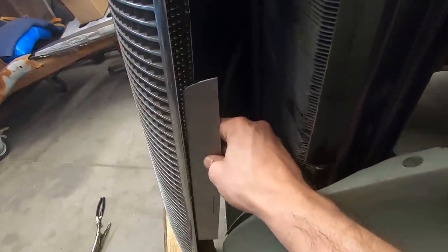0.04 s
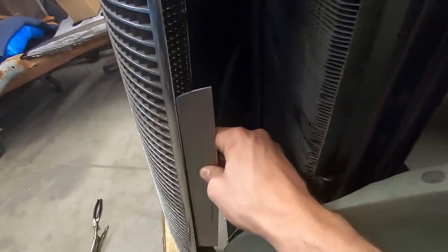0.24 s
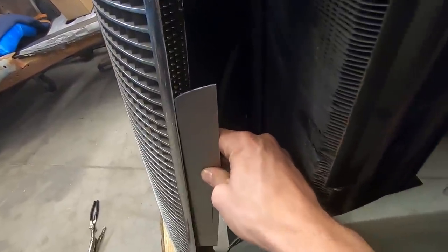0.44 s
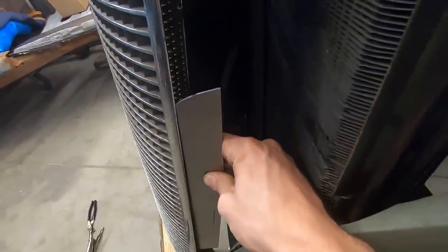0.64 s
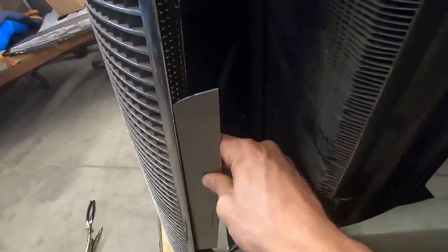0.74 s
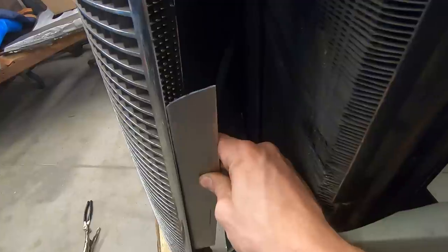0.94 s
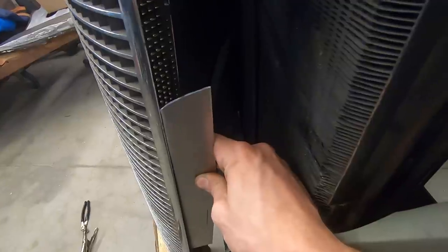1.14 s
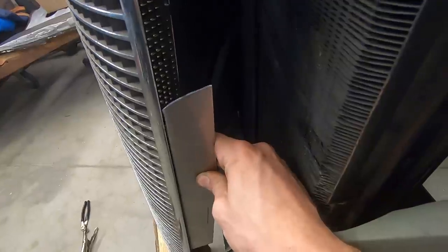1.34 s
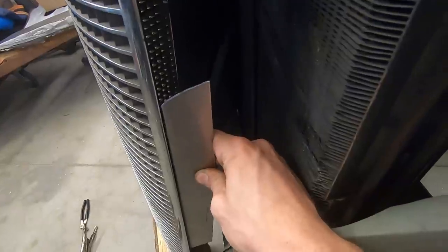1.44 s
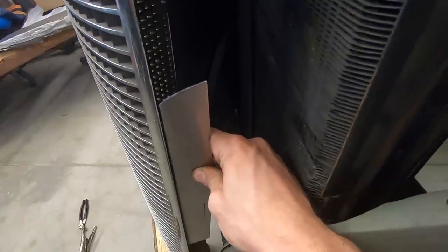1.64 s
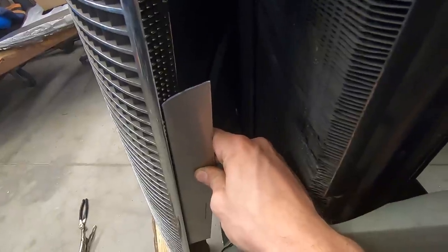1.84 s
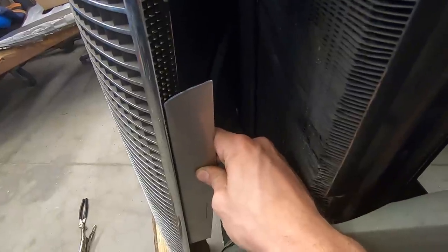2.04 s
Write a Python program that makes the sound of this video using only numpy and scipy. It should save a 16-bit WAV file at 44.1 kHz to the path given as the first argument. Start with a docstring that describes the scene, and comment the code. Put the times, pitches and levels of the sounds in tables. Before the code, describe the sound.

Sheet metal clanks sharply against a car grille, rings through a garage, then scrapes and knocks softly

```python
"""A bent metal sheet is pressed into place against a car grille in a hard-walled garage. Faint contacts come
first, then loud clanks and rebounds; short scrapes, edge ticks and soft knocks follow. Blows and stick-slip
pushes excite decaying modes, noise bursts and dense reverberant ringing. Low sinusoids swell as the panel
flexes; a fixed colour of narrow and broad bands marks every contact. Steady shaped noise, the still air of the
garage, lies beneath from start to end."""
import sys
import numpy as np
from scipy import signal
from scipy.fft import rfft, irfft
from scipy.io import wavfile

SR = 44100
rng = np.random.default_rng(int(sys.argv[2]) if len(sys.argv) > 2 else 0)


def dump(signal):
    """Clip the signal to [-1, 1] and save it as 16-bit WAV at the path in sys.argv[1]."""
    limited = np.clip(np.atleast_2d(signal).T, -1, 1)
    pcm = np.round(limited * 32767).astype(np.int16)
    wavfile.write(sys.argv[1], SR, pcm)


N = 92610  # length in samples

# blows of sheet on grille: (t/s, level/dB, then relative to it bass/dB, body/dB, clank/dB, treble/dB,
# crack/dB, favoured tone f/Hz, tone level/dB)
BLOWS = [(.066, -54.5, -2, 9, -5.5, -24, 13, 926, 2), (0.1827, -41.5, 5.5, 4.5, 0, -4, 0.5, 802, -2.5),
         (0.231, -23, -7.5, -1.5, 0.5, 4, -2.5, 1702, -13), (0.2366, -31, -25, -7, -9, 5.5, -27, 459, -6.5),
         (0.2742, -24.5, -8.5, -2, 2, -10, 2.5, 308, -10.5),
         (.298, -29.5, -8, -0.5, -1, -7, -2, 1138, -6.5),
         (.443, -39.5, -12, 10.5, -2.5, -32, -1, 471.2, -2.5), (.518, -44.5, 4, 7, 0, -22, -16, 564.6, -17),
         (1.077, -39, 0, 7.5, -2.5, -14, -1.5, 752, -5.5), (1.098, -45.5, 14, 2, -1.5, -5, -1, 720, -21),
         (1.4435, -41.5, 4, -3, 5, -22.5, -3, 1118, -7.5)]


def knocks(common):
    """Impact excitation: a blow cracks and rings on; the spot that is struck favours one tone."""
    out = np.zeros(N)
    for s, db, bass_db, body_db, clank_db, treble_db, crack_db, hz, tone_db in BLOWS:
        ringing = shelve(metal(common, crack_db), bass_db, body_db, clank_db, treble_db)
        sing = amp(tone_db) * tone(hz) * linger(hz)
        add(out, s, amp(db) * (ringing + sing))
    return out


# first crack of a contact, relative spectrum: (f/Hz, level per Hz/dB)
CRACK_SPECTRUM = [(40, -46), (110, -23), (400, -2.5), (1600, 7), (2900, 7), (4200, -4.5), (8000, -4.5),
                  (14500, -7), (16000, -11.5)]
CRACK_DB, CRACK_T60_S = 2.5, 0.09
FRESH_DB = -2  # dense ringing that is new to each contact
# dense ringing that fills the garage, relative spectrum: (f/Hz, level per Hz/dB)
WASH_SPECTRUM = [(40, -53), (100, -4), (160, 5.5), (300, 1.5), (500, 6), (800, 3.5), (1300, 3),
                 (2000, -2.5), (2900, -13.5), (3700, -12.5), (7000, -21), (15000, -16)]


def metal(common, crack_db):
    """Impulse response of sheet and grille: a broadband crack, then common and fresh ringing."""
    crack = amp(CRACK_DB + crack_db) * noise(CRACK_SPECTRUM) * fade(CRACK_T60_S)
    fresh = amp(FRESH_DB) * tail(WASH_SPECTRUM)
    return crack + common + fresh


# ringing modes of sheet and grille, relative levels: (f/Hz, level/dB)
SHEET_MODES = [(308, -0.5), (395, -7.5), (474, -1), (541, -19), (765, -4), (852, -1), (927, -4.5),
               (1088, -10), (1238, 1.5), (1320, -4.5), (1484, -24), (1653, 1), (2376, -3), (2686, -2)]
RING_DB, RING_T60_S, RING_SLOPE = -6, 0.55, -0.41  # t60 at 1 kHz, and its power law over frequency
# bright ringing of the grille bars and the sheet's edge, relative levels: (f/Hz, level/dB)
BAR_MODES = [(2256, 9), (2885, 7), (3016, 2), (3560, -10), (4080, -2), (5900, -5), (6780, -11), (7420, -6),
             (7770, -11), (9400, -2.5), (12580, -4)]
BARS_LEVEL_DB, BARS_T60_S = -12, 0.072
# colour of the reflections of the bars, relative spectrum: (f/Hz, level per Hz/dB)
BAR_REFLECTIONS = [(200, -23), (2000, -3), (15000, 6)]
SHARED_DB = -5  # dense ringing common to all blows and scrapes


def shared_ringing():
    """Modal superposition: sheet modes, bar modes spread by reflections, and some dense ringing."""
    sheet = amp(RING_DB) * modes(SHEET_MODES, RING_T60_S, RING_SLOPE)
    ping = modes(BAR_MODES, BARS_T60_S, 0)
    ping = ping / np.linalg.norm(ping)
    bars = amp(BARS_LEVEL_DB) * signal.fftconvolve(ping, tail(BAR_REFLECTIONS))[:N]
    return sheet + bars + amp(SHARED_DB) * tail(WASH_SPECTRUM)


def modes(table, t60, slope):
    """Damped modes, together of rms 1 at the start; t60 holds at 1 kHz."""
    hz, db = np.transpose(table)
    size = amp(db) / np.linalg.norm(amp(db))
    return sum(a * fade(t60 * (f / 1e3) ** slope) * tone(f) for f, a in zip(hz, size))


# reverberation time of the dense ringing: (f/Hz, t60/s)
WASH_DECAY = [(100, 1.08), (200, 1.33), (350, 1.09), (700, 0.81), (1400, 0.61), (2800, 0.62), (5000, 0.48),
              (9000, 0.34), (15000, 0.2)]


def tail(spectrum):
    """Diffuse reverberation: noise decays by frequency band, the treble sooner than the bass."""
    hz, t, z = signal.stft(noise(spectrum), SR, nperseg=512)
    z = z * np.exp(-np.log(1000) * t / read(WASH_DECAY, hz)[:, None])
    return signal.istft(z, SR, nperseg=512)[1][:N]


TONE_T60_S, TONE_SLOPE = 0.65, -0.26  # t60 at 1 kHz, and its power law over frequency
WAVER_DEPTH, WAVER_HZ = 0.51, 20  # rms depth, and upper limit of the random rate


def linger(hz):
    """Damping with fluctuation: low tones last longer, and reflections make them waver."""
    slow = signal.butter(2, WAVER_HZ, fs=SR, output="sos")
    waver = unit(signal.sosfilt(slow, rng.standard_normal(N)))
    return fade(TONE_T60_S * (hz / 1e3) ** TONE_SLOPE) * (1 + WAVER_DEPTH * waver)


BASS_HZ, BODY_HZ, BODY_Q = 270, 481, 0.5
CLANK_HZ, CLANK_Q, TREBLE_HZ = 1710, 0.96, 2760


def shelve(x, bass_db, body_db, clank_db, treble_db):
    """Contact stiffness as spectral tilt: soft gives bass and body, hard gives clank and treble."""
    low = signal.lfilter(*signal.butter(1, BASS_HZ, fs=SR), x)
    x = bell(low * amp(bass_db) + x - low, BODY_HZ, body_db, BODY_Q)
    x = bell(x, CLANK_HZ, clank_db, CLANK_Q)
    # second-order treble shelf, designed in analogue form
    corner = 2 * SR * np.tan(np.pi * TREBLE_HZ / SR)
    gain = np.sqrt(amp(treble_db / 2))
    zero, pole = corner / gain, corner * gain
    b = np.array([1, np.sqrt(2) * zero, zero ** 2])
    a = [1, np.sqrt(2) * pole, pole ** 2]
    return signal.lfilter(*signal.bilinear(b * amp(treble_db), a, SR), x)


# pushes of the sheet along the grille: (t/s, length/s, level/dB, then relative to it bass/dB, body/dB,
# clank/dB, treble/dB; separate hiss level/dB; favoured tone f/Hz, its level relative to the push/dB)
PUSHES = [(.052, 0.036, -48, 4.5, 2, -5.5, -1.5, -58, 841, -3.5),
          (0.423, 0.086, -29.5, -1, 2, -5.5, -14, -45.5, 427.2, -15),
          (0.985, 0.078, -45.5, -4.5, 13, -4.5, -5, -52, 500, 1),
          (1.048, 0.051, -38.5, 2.5, 5, -1, -10.5, -44.5, 845.7, -6.5),
          (1.44, 0.051, -43.5, 8, -1.5, -9.5, -19, -57.5, 705, -5),
          (1.592, 0.086, -39.5, -23, 3.5, -1, -26.5, -61.5, 450.7, -1),
          (1.654, 0.062, -41.5, -1, 1, -0.5, -29, -69, 1108, -7.5)]
SCRAPE_CRACK_DB = -0.5
SLIPS_PER_S, SLIP_SPREAD_DB = 2700, 2
PUSH_SKEW = 1.37  # above 1 the push peaks late
# friction hiss, relative spectrum: (f/Hz, level per Hz/dB)
HISS_SPECTRUM = [(200, 7), (2000, -5.5), (4500, 1), (7000, -1), (10500, -1.5), (13500, -1), (16000, 1.5)]
HISS_T60_S, HISS_ROOM_DB = 0.01, -6.5


def scrapes(common):
    """Stick-slip friction: tiny slips swell, shake the metal, build up one tone and hiss at the edge."""
    out = np.zeros(N)
    for s, length, db, bass_db, body_db, clank_db, treble_db, hiss_db, hz, tone_db in PUSHES:
        u = np.arange(0, length, 1 / SR) / length
        force = slips()[:len(u)] * np.sin(np.pi * u ** PUSH_SKEW)
        force = force / (np.linalg.norm(force) + 1e-9)
        ringing = signal.fftconvolve(force, metal(common, SCRAPE_CRACK_DB))[:N]
        shake = shelve(ringing, bass_db, body_db, clank_db, treble_db)
        build_up = signal.fftconvolve(force ** 2, linger(hz))[:N]
        sing = amp(tone_db) * tone(hz) * build_up
        add(out, s, amp(db) * (shake + sing))
        hiss = np.sqrt(len(u) / 2) * signal.fftconvolve(force, edge_response())
        add(out, s, amp(hiss_db) * hiss)
    return out


def slips():
    """Random impulse process: sparse slips of either sign and varied strength."""
    happens = rng.random(N) < SLIPS_PER_S / SR
    sign = rng.choice([-1, 1], N)
    strength = amp(SLIP_SPREAD_DB * np.minimum(rng.exponential(1, N), 3))
    return happens * sign * strength


def edge_response():
    """Direct and reverberant sound: the edge's short hiss and its tail in the garage."""
    near, far = noise(HISS_SPECTRUM) * fade(HISS_T60_S), tail(HISS_SPECTRUM)
    return near / np.linalg.norm(near) + amp(HISS_ROOM_DB) * far / np.linalg.norm(far)


# the edge catches on a bar: (t/s, level/dB)
CATCHES = [(0.057, -60), (.078, -86), (1.0382, -46), (1.137, -45.5), (1.442, -54), (1.47, -54),
           (1.486, -53), (1.501, -56)]
# edge tick, relative spectrum: (f/Hz, level per Hz/dB)
TICK_SPECTRUM = [(500, -25), (4000, -6), (9000, -6), (13000, 0), (14800, -6), (16000, -3)]
TICK_T60_S = 0.048


def ticks():
    """Transient radiation: each catch of the edge is a thin, bright burst of decaying noise."""
    out = np.zeros(N)
    for s, db in CATCHES:
        add(out, s, amp(db) * noise(TICK_SPECTRUM) * fade(TICK_T60_S))
    return out


# the pressed panel flexes: (t/s, length/s, level/dB, f/Hz)
PANEL_FLEXES = [(.06, 0.16, -49.5, 240), (.24, 0.18, -43.5, 145), (.47, 0.47, -46.5, 222),
                (1.11, 0.28, -41.5, 143)]


def flexes():
    """Flexural vibration: a low panel mode swells and dies as the hand presses."""
    out = np.zeros(N)
    for s, length, db, hz in PANEL_FLEXES:
        t = np.arange(0, length, 1 / SR)
        swell = np.sin(np.pi * (t / length) ** 0.66) ** 2  # peaks early
        add(out, s, amp(db) * swell * np.sin(2 * np.pi * hz * t))
    return out


# fixed colour of every contact: (f/Hz, level/dB, sharpness Q before the bell's gain correction)
COLOUR_BANDS = [(200.7, -14.5, 24), (598.5, -3.5, 5.8), (6470, -4, 44), (6780, 7, 54), (10670, -4, 21)]


def colour(contacts):
    """Fixed colouring: a few narrow and broad bands are lifted or cut in every contact."""
    for hz, db, q in COLOUR_BANDS:
        contacts = bell(contacts, hz, db, q)
    return contacts


# still air of the garage, relative spectrum: (f/Hz, level per Hz/dB)
AIR_SPECTRUM = [(20, 1.5), (45, 0), (65, 3), (95, -4.5), (160, -5), (400, -11.5), (1000, -19.5),
                (2500, -31.5), (6000, -34), (15000, -35)]
AIR_DB = -55.5


def still_air():
    """Stationary random noise: the quiet garage, strongest in the bass."""
    return amp(AIR_DB) * noise(AIR_SPECTRUM)


def noise(spectrum):
    """Spectral shaping: white noise weighted by frequency, then set to rms 1."""
    weight = amp(read(spectrum, np.fft.rfftfreq(N, 1 / SR)))
    return unit(irfft(rfft(rng.standard_normal(N)) * weight, N))


def tone(hz):
    """Simple harmonic motion: a sine of rms 1 that starts from zero."""
    return np.sqrt(2) * np.sin(2 * np.pi * hz * np.arange(N) / SR)


def fade(t60):
    """Exponential decay, 60 dB down after t60."""
    return np.exp(-np.log(1000) * np.arange(N) / SR / t60)


def bell(x, hz, db, q):
    """Resonant filtering: lifts or cuts one band."""
    return x + (amp(db) - 1) * signal.lfilter(*signal.iirpeak(hz, q * amp(db / 2), fs=SR), x)


def amp(db):
    """Logarithmic level: decibels to gain."""
    return 10 ** (np.asarray(db) / 20)


def unit(x):
    """Power normalisation: scales to rms 1."""
    return x / np.sqrt(np.mean(x ** 2) + 1e-20)


def read(points, hz):
    """Linear interpolation of a table on a log-frequency axis."""
    f, value = np.transpose(points)
    return np.interp(np.log(hz + 1), np.log(f), value)


def add(mix, s, sound):
    """Linear superposition: mixes a sound in at a time in seconds."""
    part = mix[max(round(s * SR), 0):][:len(sound)]
    part += sound[:len(part)]


def scene():
    """Superposition of all contacts, given a fixed colour, over the quiet garage."""
    common = shared_ringing()
    contacts = knocks(common) + scrapes(common) + ticks() + flexes()
    return (colour(contacts) + still_air())[None]


EDGE_HZ = 15750


def record(dry):
    """Band limitation: a linear-phase low-pass filter removes the highest treble."""
    lowpass = signal.firwin(401, EDGE_HZ, window=("kaiser", 8), fs=SR)
    return signal.oaconvolve(dry, lowpass[None], "same")


dry = scene()
out = record(dry)
dump(out)
```